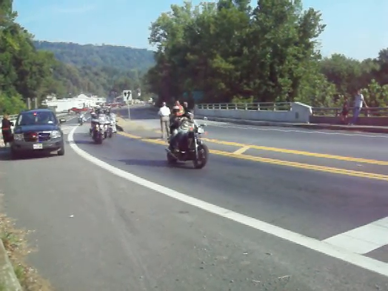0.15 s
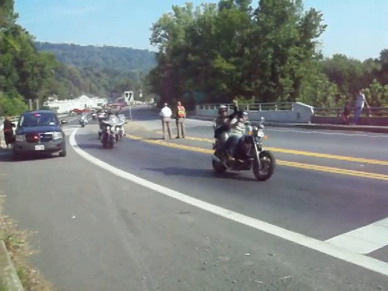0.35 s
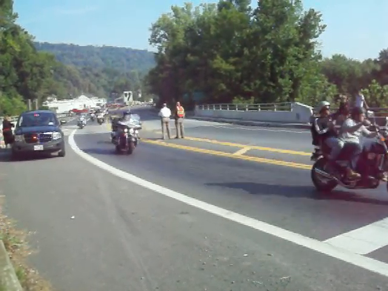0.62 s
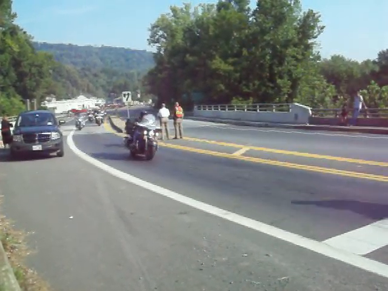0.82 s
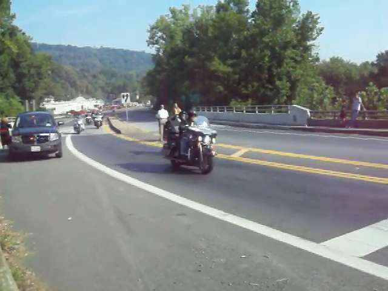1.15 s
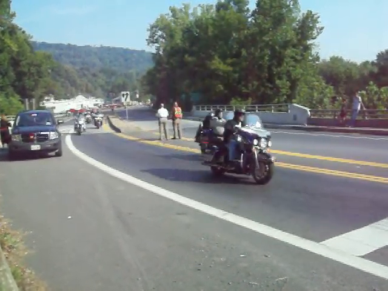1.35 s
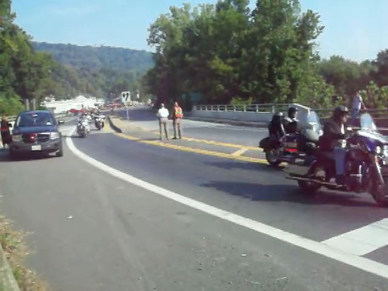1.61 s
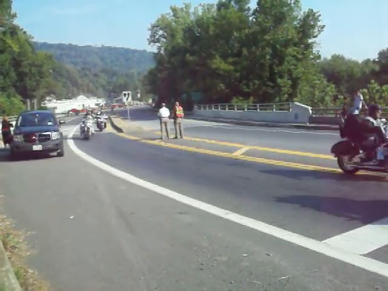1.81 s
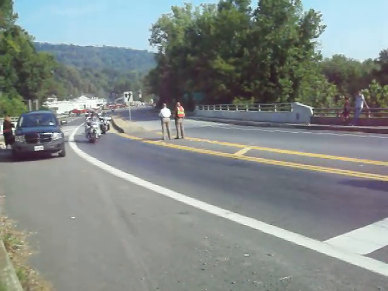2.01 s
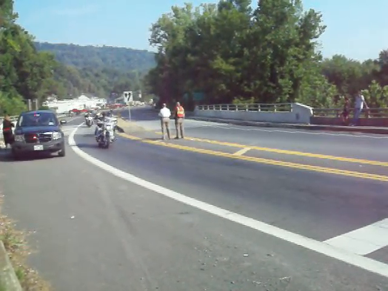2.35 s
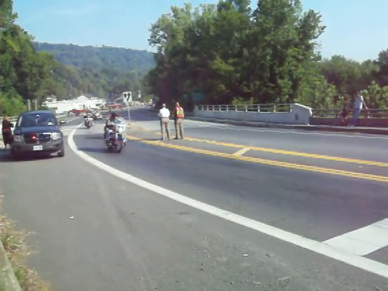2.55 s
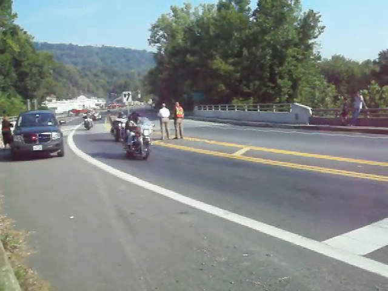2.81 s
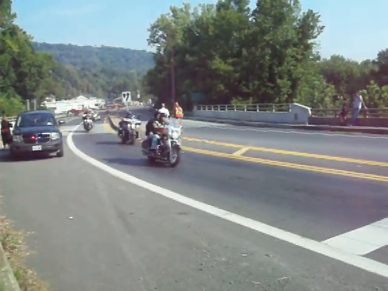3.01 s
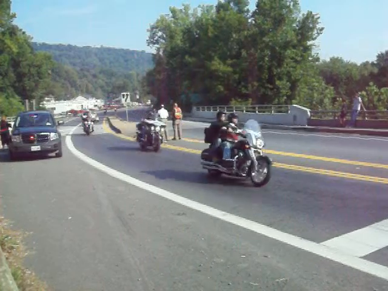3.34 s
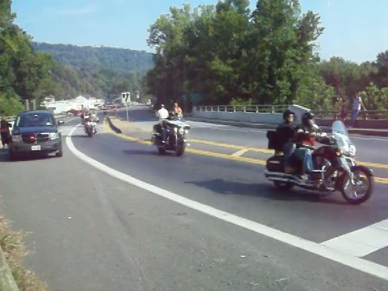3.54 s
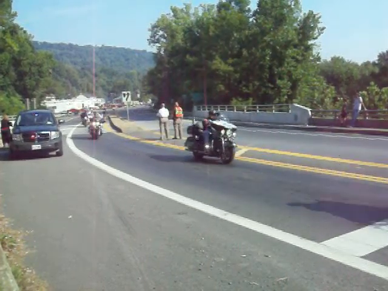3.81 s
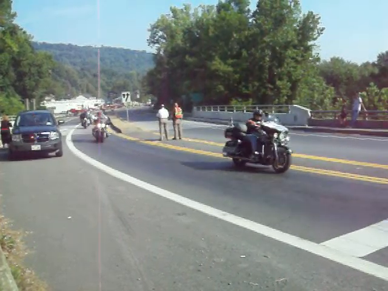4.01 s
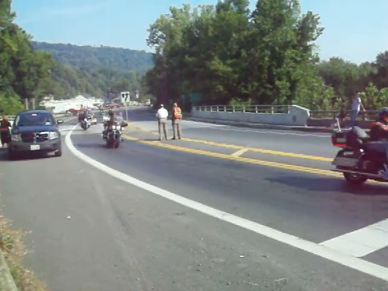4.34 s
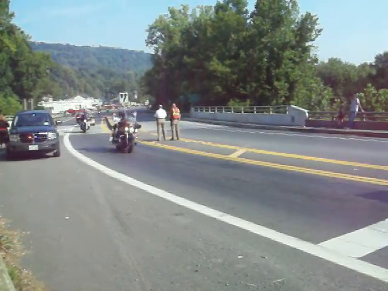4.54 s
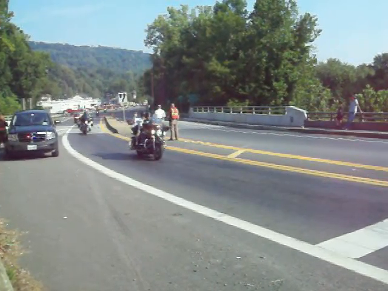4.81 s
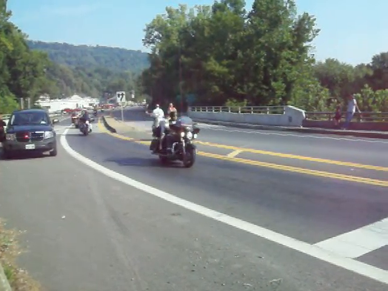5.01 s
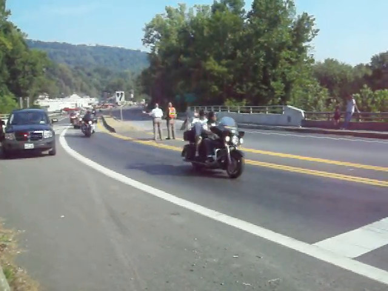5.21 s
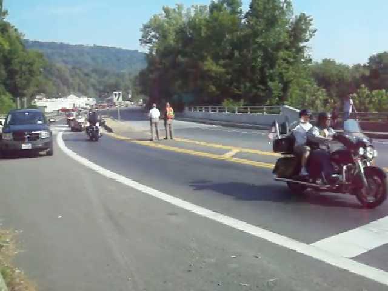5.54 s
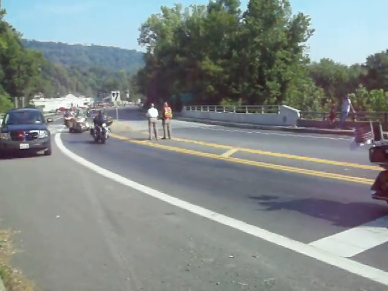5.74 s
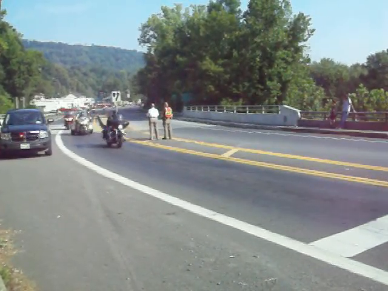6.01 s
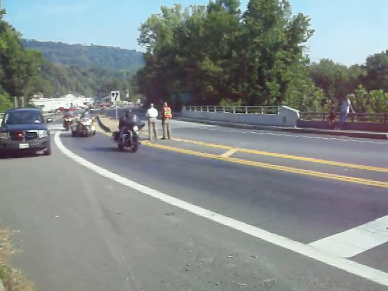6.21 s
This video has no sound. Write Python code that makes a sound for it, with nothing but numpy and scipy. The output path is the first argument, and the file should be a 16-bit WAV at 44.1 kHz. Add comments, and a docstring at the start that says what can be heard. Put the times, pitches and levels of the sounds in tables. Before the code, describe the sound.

Outdoors at a roadside bend, heavy twin-cylinder motorcycles ride past very close, one after another. Loud, fast uneven chugging opens at once, two lower engines drop in pitch as they pass, a third rattles metallically, then a long throaty pass pops and barks. A low rumble from more machines stays behind. The small camera microphone is dull, evened in level and crackles on peaks.

```python
"""At the roadside by a bend: six V-twin motorcycles ride close past a camera's microphone.
Each engine is a train of uneven firings filtered by its pipe, with engine orders ringing out as tones.
Putts, barks and pops stand out of the beat; metal chatters, and a machine squeaks once.
Gas rasp and crackle, tyre hiss and the rumble of the far column are coloured noise behind them.
Gain control evens the level; the hardest peaks overload the converter, which flips over and crackles."""
import sys
import numpy as np
from scipy import signal
from scipy.fft import rfft, irfft, next_fast_len
from scipy.io import wavfile
from scipy.ndimage import uniform_filter1d, map_coordinates

SR = 44100
rng = np.random.default_rng(int(sys.argv[2]) if len(sys.argv) > 2 else 0)


def generate_wav(signal):
    """Clip the signal to [-1, 1] and save it as 16-bit WAV at the path in sys.argv[1]."""
    frames = np.transpose(np.atleast_2d(signal))
    scaled = np.clip(frames, -1, 1) * 32767
    pcm = np.round(scaled).astype(np.int16)
    wavfile.write(sys.argv[1], SR, pcm)


N = 281358
T = np.arange(N) / SR  # seconds


def amp(db):
    """Decibels to gain."""
    return 10 ** (np.asarray(db) / 20)


def unit(x):
    """Scale to rms 1."""
    return x / np.sqrt(np.mean(x ** 2) + 1e-20)


def wobble(rate):
    """A smooth random curve with the given number of knots a second."""
    return map_coordinates(rng.standard_normal(int(N * rate / SR) + 4), [T * rate])


def swell(at, width):
    """A bell of height 1 around the time at, both in seconds."""
    return 1 / (1 + ((T - at) / width) ** 2 / 2) ** 2


def curve(points):
    """Straight lines through (seconds, value) points."""
    return np.interp(T, *np.transpose(points))


def coloured(x, points):
    """Causal minimum-phase filter with the gain of the (Hz, dB) points."""
    size = 2 * next_fast_len(N // 2 + SR // 4)
    hz, db = np.transpose(points)
    log_hz = np.log(np.fft.rfftfreq(size, 1 / SR) + 1)
    gain = amp(np.interp(log_hz, np.log(hz), db))
    # folding the cepstrum forward in time makes the filter causal
    cepstrum = irfft(np.log(gain))
    cepstrum[1:size // 2] *= 2
    cepstrum[size // 2 + 1:] = 0
    return irfft(rfft(x, size) * np.exp(rfft(cepstrum)), size)[:N]


def noise(points, gate=1):
    """Gated noise of rms 1 in the given colour."""
    return unit(coloured(gate * rng.standard_normal(N), points))


def bursts(events, rise_s, fall_s):
    """Envelope that rises to each (seconds, dB) event and dies away."""
    lead = SR // 50
    out, t = np.zeros(N + SR), np.arange(-lead, lead) / SR
    shape = np.exp(np.minimum(t / rise_s, -t / fall_s))
    for at, db in events:
        out[round(at * SR) - lead:][:len(t)] += amp(db) * shape
    return out[:N]


def crank(glide):
    """Engine cycles turned so far, as the speed eases between two values on top of a steady climb."""
    middle, cycle_hz, slope, settling, climb, firing = glide
    since = T - middle
    speed_hz = cycle_hz + climb * since + slope * settling * np.tanh(since / settling)
    turns = np.cumsum(speed_hz) / SR
    return turns - np.interp(firing, T, turns)


# Colour of a firing's pressure front. Each row: frequency in Hz, gain in dB.
FRONT_COLOUR = [(60, -1.5), (200, 8.5), (450, 7.5), (900, -6), (1400, -7.5), (3000, -18), (4500, -21.5),
                (5500, -20.5)]
REAR_LAG = .43  # share of a cycle from the front cylinder's firing to the rear's
FIRING_SCATTER_DB, THUD_SCATTER_DB = 2.5, 1.5  # the pipe evens out the firings
APPROACH_DB_PER_S, RECEDE_DB_PER_S = 34, 26.5
FACING_S = .54  # width of the change in thud as the pipe faces the microphone


def motorcycle(glide, passing, firing, pipe, orders):
    """One V-twin: pipe thud, pressure fronts and order tones, and the envelope of its gas puffs."""
    near, until, thud_db, facing, facing_db = passing
    puff_db, snap_db, sign, rear_db = firing
    approach_db = -APPROACH_DB_PER_S * np.maximum(near - T, 0)
    recede_db = -RECEDE_DB_PER_S * np.maximum(T - until, 0)
    nearness = amp(approach_db + recede_db)
    turns = crank(glide)

    # two unevenly spaced firings in every cycle, no two equally strong
    firings = np.arange(np.ceil(turns[0]), turns[-1] - 1 / 2)[:, None] + [0, REAR_LAG]
    luck = rng.standard_normal(firings.shape)
    when = np.searchsorted(turns, firings.ravel())

    def impulses(scatter_db):
        """One impulse for each firing, with its own strength."""
        strength = amp(scatter_db * luck + [0, rear_db])
        return np.bincount(when, strength.ravel(), N)[:N]

    kicks = impulses(FIRING_SCATTER_DB)
    beats = impulses(THUD_SCATTER_DB)
    thud = amp(thud_db + facing_db * swell(facing, FACING_S)) * unit(coloured(beats, pipe))
    snap = amp(snap_db) * unit(coloured(kicks, FRONT_COLOUR))

    # each order is a clean tone that swells and fades, locked in phase to the firings
    drone = np.zeros(N)
    for order, db, at, width in orders:
        pair_phase = np.angle(1 + np.exp(-2j * np.pi * order * REAR_LAG))
        phase = 2 * np.pi * order * turns + pair_phase
        drone += amp(db) * swell(at, width) * np.cos(phase - .6)

    # gas starts to escape a moment before the pressure peak: a 3 ms decay run backwards in time
    puffs = signal.lfilter([1], [1, -np.exp(-1 / (0.003 * SR))], kicks[::-1])[::-1]
    puffs = uniform_filter1d(np.roll(puffs, SR // 600), SR // 700)
    sound = sign * (nearness * (thud + snap) + drone)
    return np.array([sound, nearness * amp(puff_db) * puffs])


# Three exhaust pipes. Each row: frequency in Hz, gain in dB.
BRIGHT_PIPE = [(25, -29.5), (60, -1.5), (110, 2.5), (160, 0), (230, -4.5), (300, -5), (400, -13),
               (600, -22), (900, -30.5), (1400, -37.5), (5000, -49)]
DEEP_PIPE = [(25, -25), (45, 0), (82, -3), (130, 0.5), (180, 0.5), (250, -4), (340, -6), (450, -6.5),
             (750, -21), (1200, -42), (5000, -51.5)]
TOURING_PIPE = [(25, -25.5), (50, 0), (78, 7), (115, -1), (160, -0.5), (220, -11.5), (305, 1.5), (420, -8),
                (600, -11), (950, -23.5), (1500, -42.5), (5000, -48.5)]
# Engine orders that ring out of each exhaust, one table a machine. Each row: multiple of the cycle
# rate, level in dB, loudest moment in seconds, width of the swell in seconds.
ORDERS_1 = [(5, -17.5, .35, .7), (6, -23, .7, .4), (7, -25, .55, .35), (8, -26, .85, .5), (9, -28, .35, .5),
            (10, -23, .55, .7), (10, -25, 1.35, .12), (12, -25.5, .3, .5), (13, -26, .95, .25),
            (14, -31, .05, .5), (15, -30, .85, .27), (22, -35, .75, .35), (23, -34, .9, .25)]
ORDERS_2 = [(5, -18, 2.05, .25), (5, -14, 1.4, .27), (6, -21, 1.65, .25), (9, -20.5, 2, .13),
            (13, -25, 2.2, .12), (16, -24, 1.5, .16)]
ORDERS_3 = [(5, -13.5, 2.9, .5), (5, -15, 2.35, .12), (9, -20, 2.9, .18), (10, -24.5, 2.7, .5),
            (14, -30, 3.5, .27), (15, -23.5, 3.15, .33), (16, -25, 2.6, .3), (16, -27, 3.35, .18)]
ORDERS_4 = [(5, -17.5, 5.5, .12), (5, -16.5, 4.1, .65), (7, -22, 3.4, .25), (7, -16, 4.3, .25),
            (7, -16, 5.12, .22), (7, -17, 6, .2), (9, -23.5, 4.95, .5), (9, -22, 3.9, .18),
            (10, -24, 5.2, .18), (11, -29, 4.4, .5), (12, -26, 4.9, .5), (13, -25, 4.25, .12),
            (17, -28, 5.4, .5), (17, -25.5, 4.15, .27), (17, -25, 4.75, .12), (19, -26.5, 4.2, .3),
            (20, -27, 3.75, .12), (21, -29, 3.9, .25), (22, -31, 3.8, .27), (23, -27, 3.6, .18),
            (24, -24.5, 3.95, .14), (26, -31, 3.55, .14), (28, -31, 5.8, .12)]
ORDERS_5 = [(5, -21, 5.95, .25), (6, -21, 5.95, .15), (10, -21, 6.2, .3), (13, -25, 6.3, .12),
            (21, -27, 5.65, .12), (21, -28, 6.3, .15)]
ORDERS_6 = [(4, -16.5, 1.95, .22), (5, -19, 1.65, .12), (9, -21.5, 1.7, .18), (9, -19, 2.2, .12),
            (12, -23, 2.45, .12), (18, -25.5, 1.72, .16), (22, -30, 1.75, .2)]
# Engine speeds; the second and sixth machines ride abreast and drop in pitch as they pass.
# Each row: middle of the glide in seconds, four-stroke cycles per second there, slope of the glide there
# in cycles per second squared, settling time in seconds, added steady climb in cycles per second
# squared, one front-cylinder firing in seconds.
GLIDES = [(.8, 23.58, 2.39, 5, 0, .045), (2.1, 18.7, -9.5, .29, 0, 1.77), (3, 20.45, 1.2, 1, 0, 2.955),
          (5.076, 17.225, 2.016, 1.58, 0, 3.794), (6, 14.65, .25, 1, 0, 6.35),
          (2.1, 18.9, -15.2, .25, 3.5, 2.18)]
# Passes by the microphone. Each row: end of the approach fade in seconds, start of the receding fade in
# seconds, thud level in dB, moment the pipe faces the microphone in seconds, change in thud then in dB.
PASSES = [(0, 1.02, -25, 1.1, 10.5), (1.3, 3.4, -29, 1.6, 7), (2.3, 3, -20.5, 4.3, 3),
          (2.8, 9, -27.5, 2.6, 3.5), (5.701, 5.6, -34.5, 4.7, 10.5), (1.6, 1.5, -27, 1.8, -8)]
# Firing character. Each row: gas puff level in dB against the other machines, pressure front level in
# dB, sign of the machine's sound (1 crest, -1 suction), rear cylinder in dB against the front.
FIRINGS = [(7.5, -34, -1, -0.5), (6, -39, -1, -0.5), (-3, -36, -1, -7.5), (-4.5, -35, 1, -1),
           (-6.5, -43, 1, 4), (-6.5, -50, -1, -5.5)]


def procession():
    """Six machines pass, each with its own speed, pipe and ringing orders; sounds and puffs add up."""
    pipes = [BRIGHT_PIPE, DEEP_PIPE, BRIGHT_PIPE, TOURING_PIPE, DEEP_PIPE, TOURING_PIPE]
    orders = [ORDERS_1, ORDERS_2, ORDERS_3, ORDERS_4, ORDERS_5, ORDERS_6]
    return sum(motorcycle(*machine) for machine in zip(GLIDES, PASSES, FIRINGS, pipes, orders))


# Heavy firings that stand out of the beat. Each row: time in seconds, relative pressure with
# suction negative.
PUTTS = [(0.02, 0.087), (.067, -0.3), (0.159, -0.21), (0.18, .45), (.203, -0.093), (.248, -0.11),
         (.337, -0.62), (0.453, -0.65), (.54, -0.094), (.583, -1.1), (.623, 0.37), (0.73, -0.62),
         (0.773, -0.37), (.839, -0.68), (.856, -0.41), (0.88, 0.25), (.924, -0.61), (.965, -0.3),
         (1.007, -0.78), (1.047, -.36), (1.107, -0.35), (1.172, -.48), (1.253, -0.28), (1.336, 0.46),
         (1.361, 0.35), (1.387, 0.3), (1.415, -0.58), (1.552, -0.85), (1.631, 0.2), (1.773, 0.96),
         (1.795, -0.59), (1.868, 0.65), (1.918, -0.47), (1.94, -.36), (1.968, 0.52), (2.092, 0.016),
         (2.15, -0.62), (2.179, -0.27), (2.233, 0.65), (2.262, -0.5), (2.413, -0.085), (2.509, -0.91),
         (2.522, 0.54), (2.609, -.45), (2.713, 0.49), (2.781, -0.34), (2.808, 0.28), (2.908, -0.21),
         (2.956, -0.58), (2.98, -0.69), (3.003, 0.44), (3.101, -0.047), (3.146, -0.37), (3.199, -.36),
         (3.295, -0.67), (3.422, -0.052), (3.559, -0.32), (3.597, 0.19), (3.676, -0.83), (3.727, 0.25),
         (3.816, .36), (3.958, -1.1), (3.99, 0.72), (4.023, 1), (4.056, 0.29), (4.12, 0.29), (4.146, 0.49),
         (4.209, 0.21), (4.274, 0.75), (4.505, -0.63), (4.527, 0.44), (4.772, 0.17), (4.832, 0.43),
         (4.89, 0.48), (4.949, 0.23), (4.98, -0.32), (5.142, .38), (5.197, -0.62), (5.214, 0.34),
         (5.438, -0.22), (5.489, .36), (5.551, 0.29), (5.667, -0.66), (5.693, 0.47), (6.267, 0.65)]


def putts(db=-1, width_s=0.00036, rebound=0.23, rebound_s=0.00093):
    """Each heavy firing is one pointed pressure pulse between two shallow swings the other way."""
    lead = SR // 100
    out, t = np.zeros(N + SR), np.arange(-lead, lead) / SR
    point = np.exp(1 / 2 - np.hypot(t / width_s, 1 / 2))
    shape = point - rebound * np.exp(-(t / rebound_s) ** 2)
    for at, pressure in PUTTS:
        out[round(at * SR) - lead:][:len(t)] += pressure * shape
    return amp(db) * out[:N]


# Barks, very hard firings close by. Each row: time in seconds, number of needle peaks, gap between
# the peaks in ms.
BARKS = [(.0447, 2, .28), (.0901, 2, .25), (.1359, 2, .27), (.2265, 2, .55), (.2715, 2, .85),
         (.3163, 3, .4), (.3612, 1, 0), (.4053, 2, .3), (.4936, 3, .25), (.6662, 2, .4), (.7092, 2, .28),
         (.7517, 2, .38), (.7945, 1, 0), (1.2102, 1, 0), (1.747, 2, .25), (3.3901, 1, 0), (3.7949, 1, 0),
         (3.8605, 2, .25), (3.9252, 1, 0), (4.1846, 1, 0), (4.2485, 1, 0), (4.3119, 2, .38),
         (4.3384, 2, .5), (4.375, 1, 0), (4.4018, 1, 0), (4.4376, 2, .8), (4.6245, 1, 0), (4.6856, 2, .25),
         (4.7457, 3, .33), (4.8064, 2, .25), (4.8658, 1, 0), (4.924, 1, 0), (5.0085, 1, 0), (5.1005, 1, 0),
         (5.3291, 1, 0), (6.0888, 3, .25)]


def hard_firings(crest_db=-2.5, rise_s=0.00074, fall_s=0.00143, suction_db=-17):
    """A pressure crest topped by needle peaks, with a shallow suction behind it."""
    out, t = np.zeros(N + SR), np.arange(-SR // 200, SR // 100) / SR
    crest = amp(crest_db) * np.exp(-(t / np.where(t < 0, rise_s, fall_s)) ** 2)
    suction = amp(suction_db) * np.exp(-((t - .003) / .0015) ** 2)
    for at, count, gap_ms in BARKS:
        delays = (np.arange(count) - (count - 1) / 2) * gap_ms / 1000
        needles = 2.7 * np.exp(-((t - delays[:, None]) / .00007) ** 2).sum(0)
        out[round(at * SR) - SR // 200:][:len(t)] += crest + needles - suction
    return out[:N]


# Single firings that spit out of the pipes. Each row: time in seconds, relative level in dB.
POPS = [(0.182, -32), (0.451, -24), (0.923, -20.5), (0.965, -17), (1.004, -33), (1.106, -22), (1.252, -25),
        (1.523, -21), (1.602, -19), (2.179, -25), (2.847, -25), (2.978, -22), (3.146, -22), (3.175, -26.6),
        (3.368, -19), (3.533, -23), (3.559, -21), (3.784, -12.5), (4.297, -14), (4.502, -44), (4.531, -37),
        (4.645, -16), (4.701, -12), (4.734, -14), (4.79, -14), (4.846, -20), (4.98, -11.5), (5.034, -17),
        (5.067, -15.5), (5.09, -23), (5.121, -13), (5.175, -12), (5.229, -22), (5.25, -17), (5.281, -20),
        (5.304, -16), (5.356, -19), (5.387, -20), (5.409, -14), (5.439, -14), (5.512, -14), (5.542, -18),
        (5.594, -10), (5.615, -29), (5.665, -17.5), (5.695, -16), (5.746, -16), (5.846, -17.5),
        (5.945, -18), (6.015, -22), (6.043, -21), (6.331, -18)]
# Colour of a pop. Each row: frequency in Hz, gain in dB.
POP_COLOUR = [(120, -14), (300, 5.5), (600, 2.5), (1000, -7), (1500, 0.5), (2200, -5.5), (2700, -15),
              (4000, -24.5), (5500, -26.5)]


def exhaust_pops(db=2, rise_s=0.0017, fall_s=0.0013):
    """Single rich firings spit a short burst of turbulent gas, here coloured noise."""
    return amp(db) * bursts(POPS, rise_s, fall_s) * noise(POP_COLOUR)


# Sharp metallic ticks of the third machine. Each row: time in seconds, relative peak in dB.
TICKS = [(2.3513, -27), (2.4298, -28), (2.4447, -22), (2.4614, -38), (2.4798, -21), (2.5077, -21.5),
         (2.6085, -22), (2.6449, -23), (2.7067, -20.5), (2.7581, -24), (2.7791, -31), (2.8824, -29),
         (2.9037, -21.5), (2.9506, -18), (2.9743, -31), (3.0023, -18), (3.0737, -22.5)]


def chatter(db=-48, tick_db=-5, rise_s=0.00062, fall_s=0.0015, uneven_db=5):
    """Bright metal parts rattle on the third machine as uneven noise, with sharper ticks standing out."""
    passing = np.interp(T, [2.25, 2.45, 3.0, 3.25], [0, 1, 1, 0])
    rattle = amp(db) * passing * unit(amp(uneven_db * wobble(180)))
    ticks = amp(tick_db) * bursts(TICKS, rise_s, fall_s)
    metal = noise([(2500, -44), (3800, -12.5), (4400, -6.5), (5400, -15.0), (6500, -36)])
    return (rattle + ticks) * metal


def squeak(db=-26, pitch_hz=3050, rise_hz_per_s=25000, width_s=0.0047):
    """One short rising chirp from a passing machine."""
    t = T - 2.683
    phase = 2 * np.pi * (pitch_hz + rise_hz_per_s * t / 2) * t
    return amp(db) * np.exp(-(t / width_s) ** 2) * np.sin(phase)


# Colours of the exhaust rasp, the crackle over it, the tyre and engine hiss, and the far column's
# rumble. Each row: frequency in Hz, relative density in dB per Hz.
RASP = [(150, -22), (350, -7.5), (560, 0), (720, -3.5), (900, -3), (1150, -19), (2000, -32.5),
        (5000, -37.5)]
CRACKLE = [(400, -7.5), (1000, 3.5), (1500, 4.5), (2200, -1), (3000, -7), (4200, -7), (5500, -29)]
HISS = [(500, -3.5), (1500, -2.5), (2200, 1), (2900, 6), (3600, 0), (4500, -1), (5500, -6.5)]
RUMBLE = [(15, -12.5), (35, -7), (70, 0), (140, 1.5), (220, -4), (330, -9), (500, -19), (1000, -29),
          (3000, -57.5)]
# Bursts of throttle. Each row: time in seconds, width in seconds, change in rasp level in dB, change in
# the puffs' share of the crackle in dB, change in their share of the hiss in dB.
THROTTLE = [(0.351, 0.73, 1.5, 8, 15), (1.519, 0.24, 2, 9.5, -3), (3.4, 0.28, 0.5, 2.5, 0.5),
            (5.1, 0.95, 6, 17, -11), (5.301, 0.043, 2.5, 3.5, 3), (6.309, 0.042, 4.5, 8.5, -0.5)]
# Tyre and engine hiss, around which it flickers. Each row: time in seconds, level in dB.
HISS_DB = [(0, -42.5), (.5, -39.5), (1.3, -39.5), (3.5, -38.5), (5.3, -39.5), (6.3, -34.5)]
# Rumble of the far column. Each row: time in seconds, level in dB.
RUMBLE_DB = [(0, -23), (.9, -22), (1.6, -19), (2.2, -20.5), (3.2, -20), (4.5, -21), (5.5, -18),
             (6.38, -17.5)]


def road_noise(puffs, rasp_db=-32.5, crackle_db=-37, rasp_floor=1.19, crackle_floor=1.77, spit_share=0.52):
    """Turbulent gas rasps with every puff and throttle reshapes it, over hiss and the far rumble."""
    throttle = sum(np.outer(change_db, swell(at, width)) for at, width, *change_db in THROTTLE)
    rasp_change, crackle_change, hiss_change = throttle
    # puffs keep their beat but are levelled over half a second
    puffs = puffs / np.sqrt(np.abs(uniform_filter1d(puffs ** 2, SR // 2)) + 1e-6)

    rumble = amp(curve(RUMBLE_DB)) * noise(RUMBLE)
    rasp = amp(rasp_db + rasp_change) * noise(RASP, puffs + rasp_floor)
    crackle_gate = amp(crackle_change) * puffs + amp(crackle_change / 2) * crackle_floor
    crackle = amp(crackle_db + 2.5 * wobble(30)) * noise(CRACKLE, crackle_gate)
    hiss_gate = 1 + spit_share * amp(hiss_change) * puffs
    hiss = amp(curve(HISS_DB) + 2.43 * wobble(57)) * noise(HISS, hiss_gate)
    return rumble + rasp + crackle + hiss


def scene():
    """Engines, their noise, putts, pops and barks at one microphone."""
    engines, puffs = procession()
    background = road_noise(puffs)
    firings = putts() + hard_firings() + exhaust_pops()
    return (engines + firings + chatter() + squeak() + background)[None]


FULL_SCALE = .72  # the converter's rail


def gain_control(x, target_db=-14, window_s=0.062, strength=0.56):
    """The camera rides its gain part of the way towards a steady level."""
    clipped = np.clip(x, -FULL_SCALE, FULL_SCALE)
    power = np.abs(uniform_filter1d(clipped ** 2, int(window_s * SR))) + 1e-6
    return x * (amp(target_db) / np.sqrt(power)) ** strength


def record(dry, overload=1.25, top_hz=16500):
    """A quarter-rate converter saturates after gain control; overloaded crests flip to the negative rail."""
    band_limit = signal.firwin(161, 5650, window=("kaiser", 8), fs=SR)
    x = signal.resample_poly(gain_control(dry[0]), 1, 4, window=band_limit)
    held = x / (1 + np.abs(x / (.96 * FULL_SCALE)) ** 6) ** (1 / 6)
    crest = (x >= np.roll(x, 1)) & (x > np.roll(x, -1))
    flipped = (x > overload) & crest
    # a few flips last two samples
    flipped |= np.roll(flipped, 1) & (rng.random(len(x)) < .08)
    samples = np.where(flipped, -FULL_SCALE, held)
    y = signal.resample_poly(samples, 4, 1, window=band_limit)[:N]
    # the overshoot around each flip is clipped, which gives the crackle its top octave
    y = np.clip(y, -FULL_SCALE, FULL_SCALE)
    return signal.sosfiltfilt(signal.butter(12, top_hz, fs=SR, output="sos"), y)[None]


dry = scene()
out = record(dry)
generate_wav(out)
```